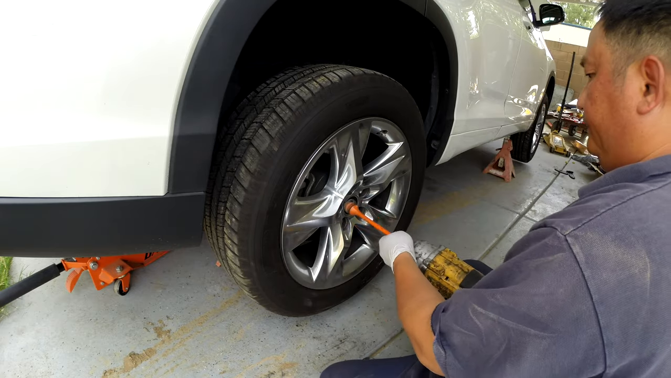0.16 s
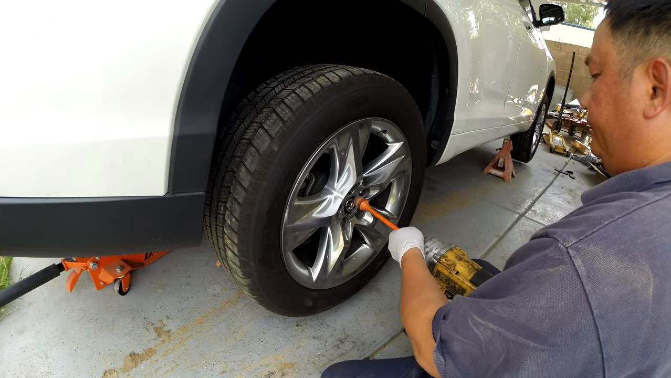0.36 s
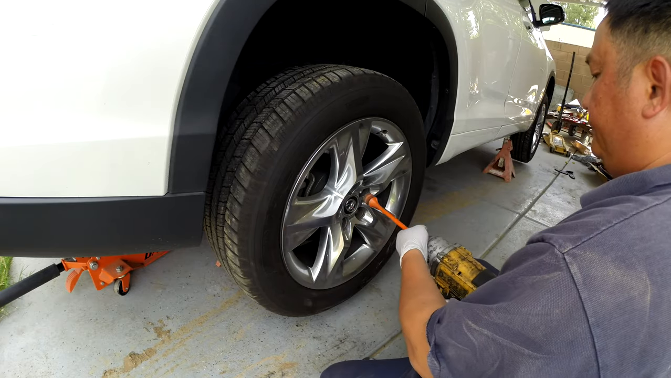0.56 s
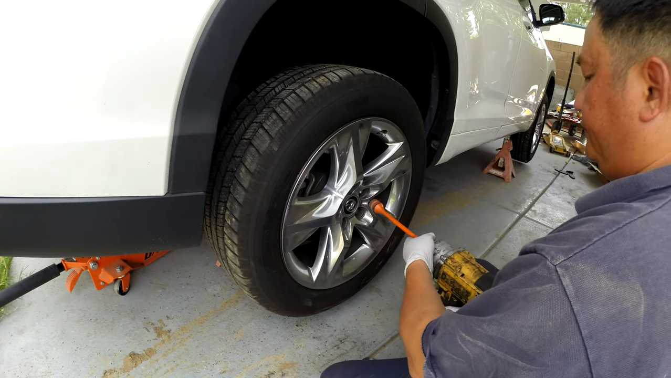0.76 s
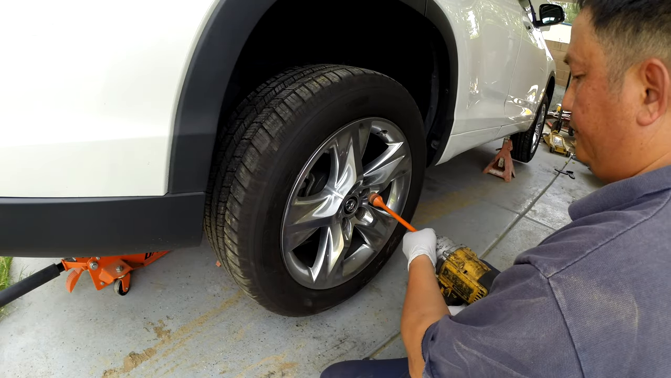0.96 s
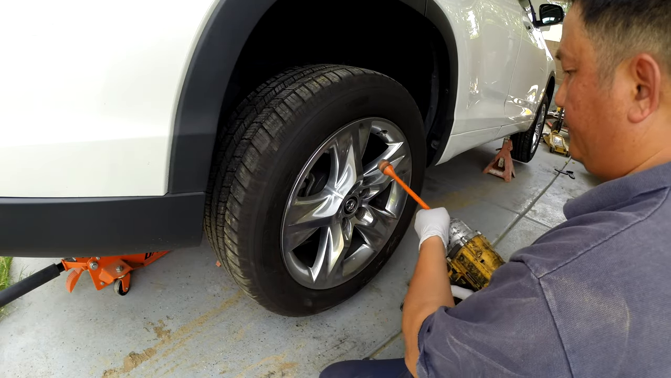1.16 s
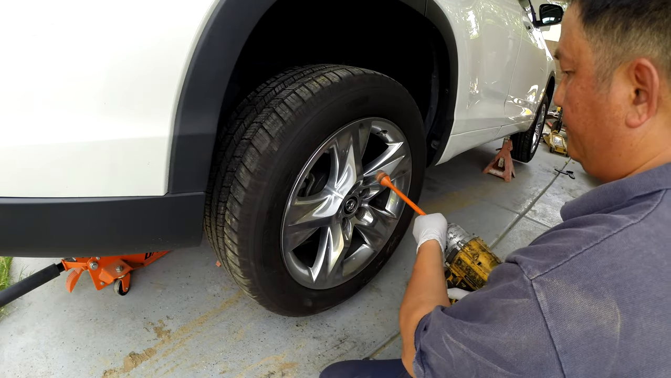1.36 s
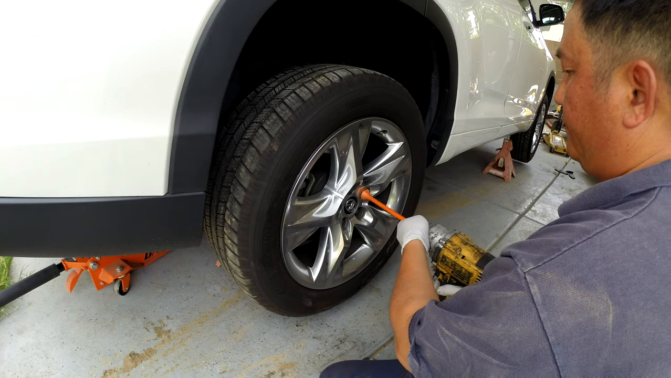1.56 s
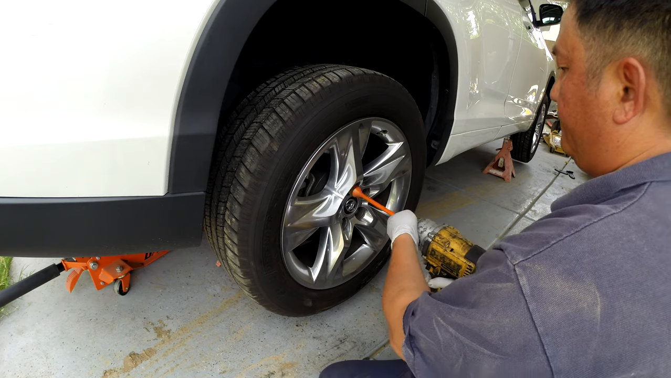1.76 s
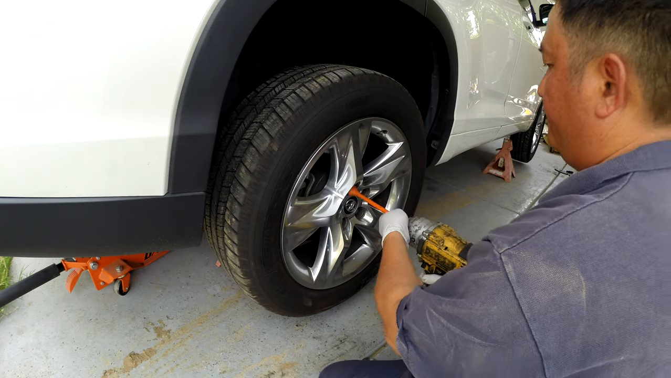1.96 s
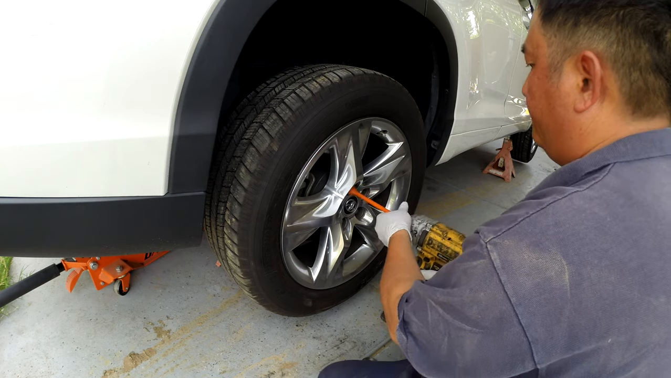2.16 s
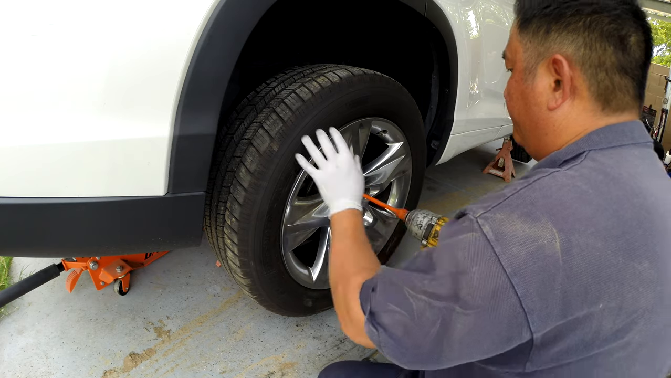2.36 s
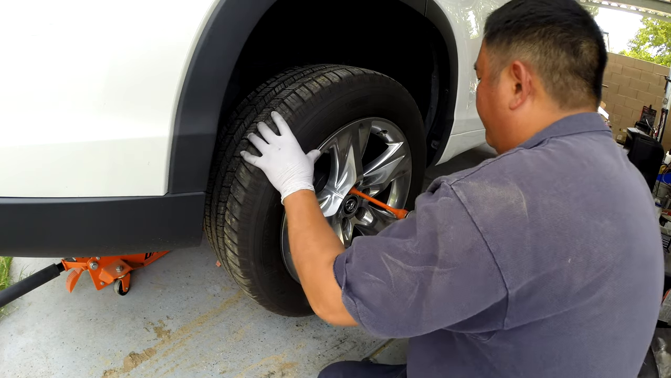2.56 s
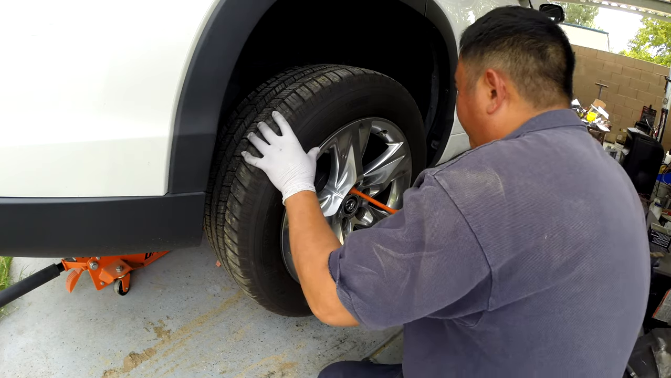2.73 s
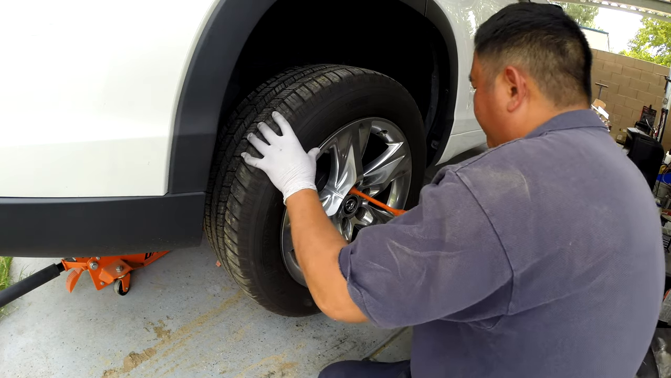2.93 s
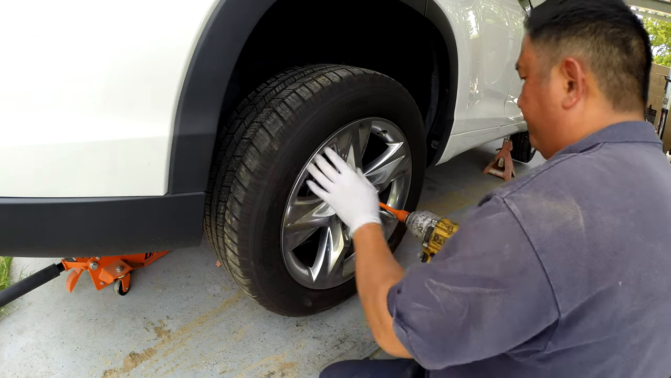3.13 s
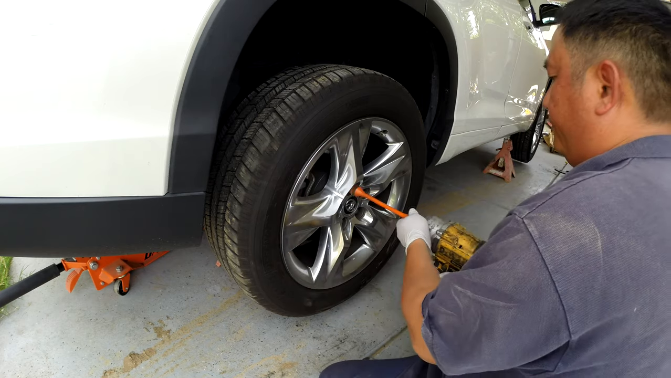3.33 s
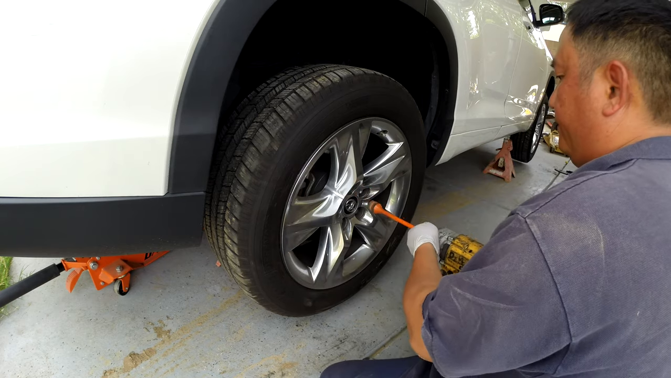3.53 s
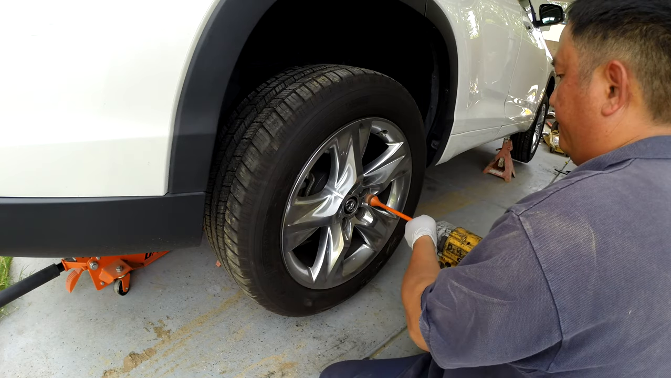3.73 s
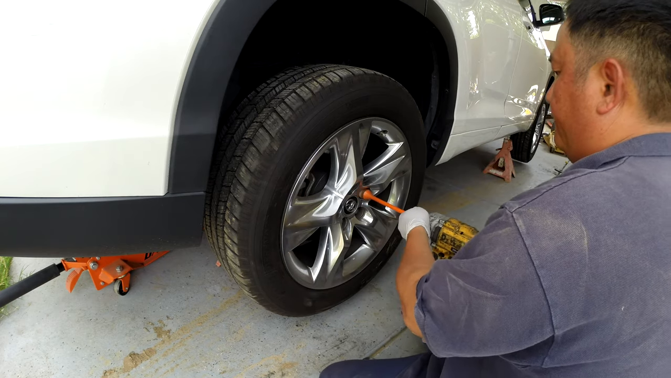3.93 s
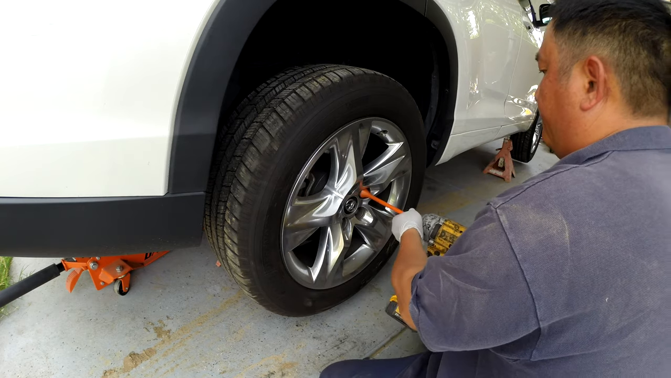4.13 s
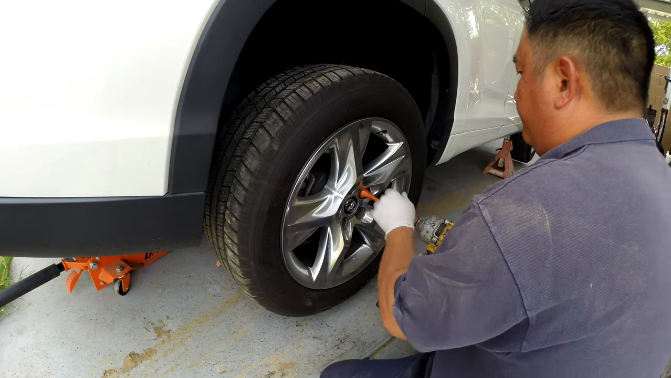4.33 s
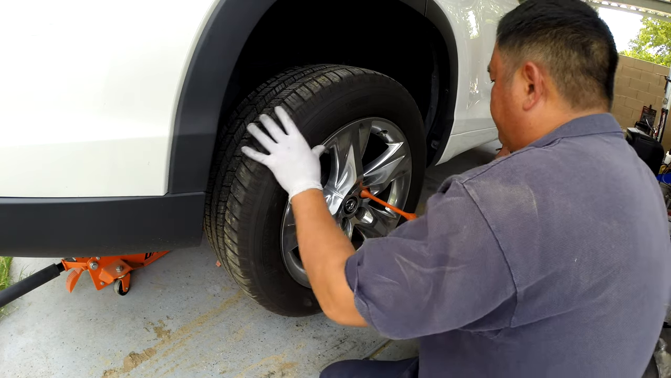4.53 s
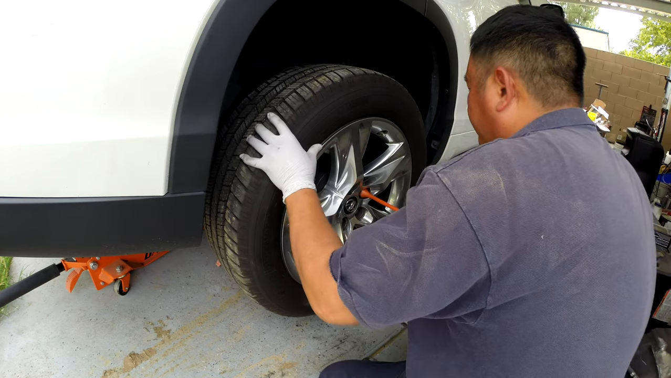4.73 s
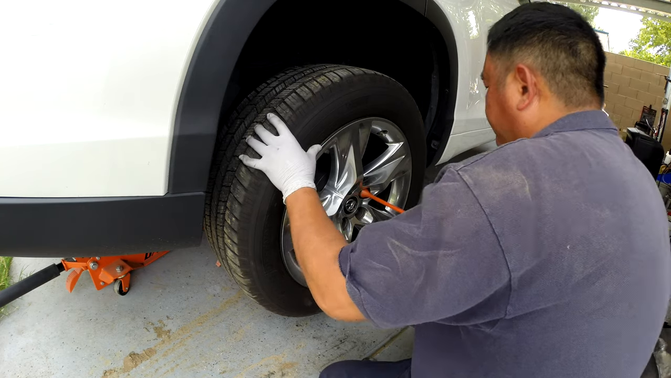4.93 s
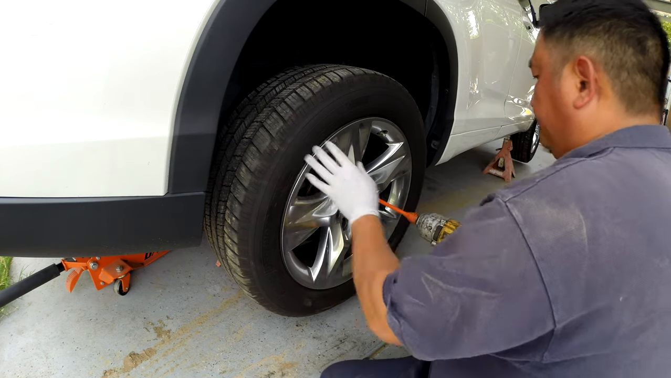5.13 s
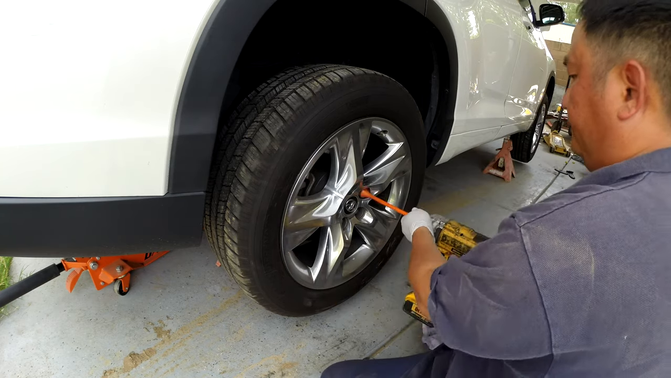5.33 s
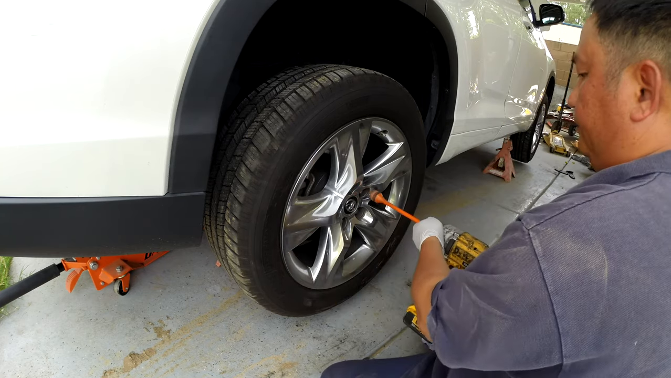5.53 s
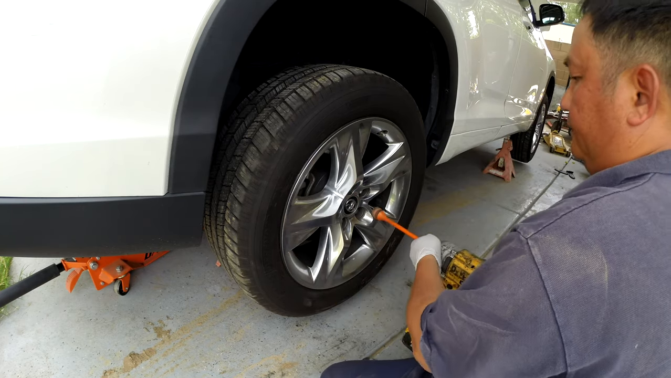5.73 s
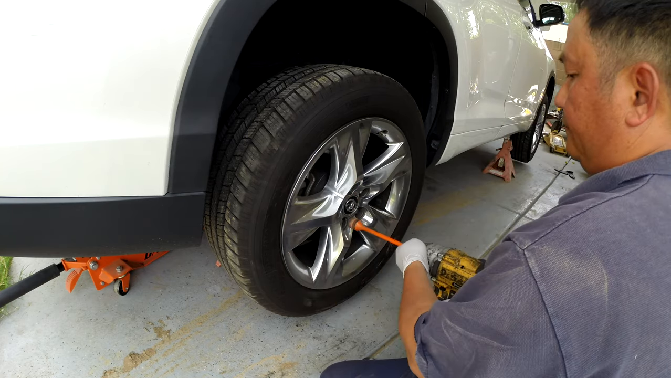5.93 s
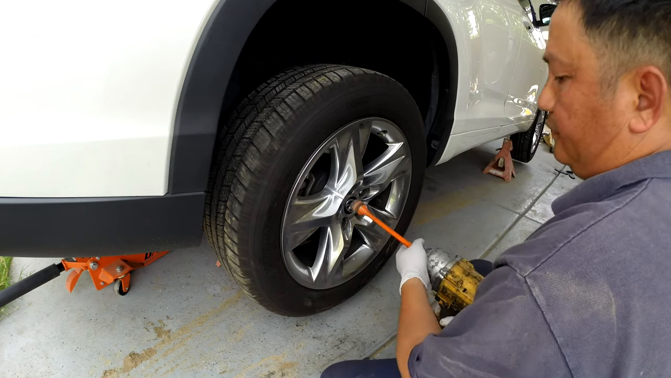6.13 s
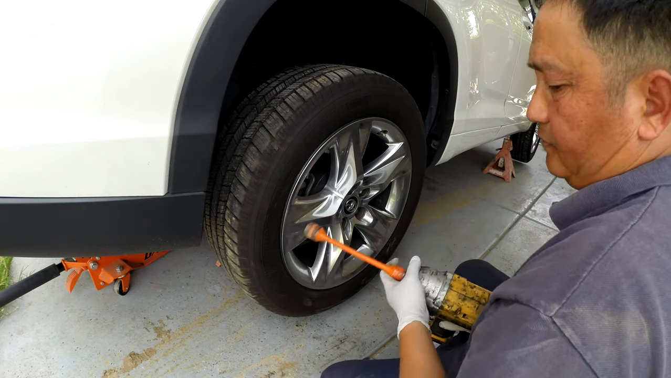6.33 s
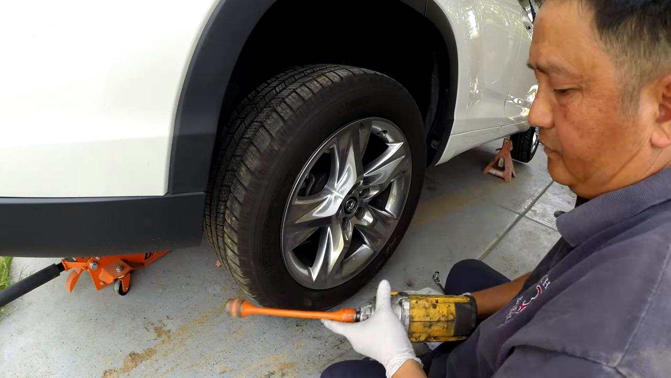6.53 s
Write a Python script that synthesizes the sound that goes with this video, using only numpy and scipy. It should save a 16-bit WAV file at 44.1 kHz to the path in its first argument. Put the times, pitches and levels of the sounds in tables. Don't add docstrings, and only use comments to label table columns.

```python
import sys
import numpy as np
from scipy import signal
from scipy.fft import rfft, irfft
from scipy.io import wavfile

SR = 44100
rng = np.random.default_rng(int(sys.argv[2]) if len(sys.argv) > 2 else 0)


def rack_gain(trim_db):
    fader = np.asarray(trim_db, float)
    return 10 ** (fader / 20)


def transcribe(u):
    v = np.clip(np.atleast_2d(u).T, -1, 1)
    q = np.round(v * 32767).astype(np.int16)
    wavfile.write(sys.argv[1], SR, q)


N = 294572


def rms_one(x):
    return x / np.sqrt(np.mean(x ** 2) + 1e-20)


def filtered(x, order, hz, kind="low"):
    return signal.sosfilt(signal.butter(order, hz, kind, fs=SR, output="sos"), x)


def colour(x, spectrum):
    size = 8192
    hz, db = np.transpose(spectrum)
    grid_hz = np.arange(size // 2 + 1) * SR / size + 1
    gain = rms_one(rack_gain(np.interp(np.log(grid_hz), np.log(hz), db)))
    cepstrum = irfft(np.log(gain))
    cepstrum[1:size // 2] *= 2
    cepstrum[size // 2 + 1:] = 0
    response = irfft(np.exp(rfft(cepstrum)))
    return signal.fftconvolve(x, response)[:N]


def ring(x, hz, t60):
    r = rack_gain(-60 / (t60 * SR))
    w = 2 * np.pi * hz / SR
    return signal.lfilter([0, np.sin(w)], [1, -2 * r * np.cos(w), r * r], x + 1e-18)


def body(x, modes):
    return sum((-1) ** k * rack_gain(db) * ring(x, hz, t60) for k, (hz, db, t60) in enumerate(modes))


def uneven(shape, spread_db):
    size_db = spread_db * np.minimum(rng.exponential(1, shape), 5)
    return rms_one(rng.standard_normal(shape) * rack_gain(size_db))


def chatter(db, rise_ms, decay_ms):
    ms = np.arange(4000) / SR * 1000
    rise, decay = [np.clip(np.reshape(v, (-1, 1)), .1, 30) for v in (rise_ms, decay_ms)]
    shape = (1 - np.exp(-(ms / rise) ** 2)) * np.exp(-ms / decay)
    shape = shape / shape.max(axis=1, keepdims=True)
    return uneven((len(db), len(ms)), spread_db=1.5) * shape * rack_gain(db)[:, None]


def lay(s, rows):
    out = np.zeros(N + rows.shape[1])
    for start, row in zip(np.round(s * SR).astype(int), rows):
        out[start:start + len(row)] += row
    return out[:N]


def low_and_high(x, y):
    return filtered(x, 2, 6000, "low") - filtered(y, 2, 6000, "high")


def contacts(s, rows, bright_db):
    return low_and_high(lay(s, rows), lay(s, rows * rack_gain(bright_db)[:, None]))


# (frequency [Hz], level [dB per Hz])
STREET_SPECTRUM = [(53, -28.5), (90, -3), (130, 0.5), (161, -20), (191, 1.5), (218, -13.5), (357, -17.5),
                   (1190, -24.5), (1920, -29.5), (5060, -36), (13900, -50.5), (15500, -66.5)]


def street(gain_db):
    return rack_gain(gain_db - 51.0) * rms_one(colour(rng.standard_normal(N), STREET_SPECTRUM))


# (frequency [Hz], width [Hz], level [dB])
HUM_TONES = [(190, 12, -57), (118, 10, -63), (1147, 4, -72)]


def compressor(gain_db):
    hum = 0
    for hz, width_hz, db in HUM_TONES:
        t60 = np.log(1000) / np.pi / width_hz
        hum = hum + rack_gain(db) * rms_one(ring(rng.standard_normal(N), hz, t60))
    return rack_gain(gain_db / 2) * hum


# (time [s], top level [dB], half length [s])
WIND_GUSTS = [(0.723, -54, 0.046), (1.024, -51, 0.033), (1.264, -51, 0.076), (1.975, -40, 0.064),
              (2.147, -43, 0.03), (2.282, -41, 0.049), (2.657, -38, 0.017), (4.072, -37, 0.065),
              (4.223, -23.5, 0.028), (4.358, -24.5, 0.044), (4.462, -29, .035), (4.576, -35, 0.088),
              (5.742, -50, .04), (6.062, -50, 0.029), (6.18, -53, .05), (6.565, -52, 0.032)]


def wind(gain_db):
    t = np.arange(N) / SR
    knots = np.arange(100) / 21
    lumps_db = 2.5 * np.interp(t, knots, rng.standard_normal(len(knots)))
    breeze = rack_gain(-52.5 + gain_db + lumps_db)
    gusts = sum(rack_gain(db) * np.exp(-((t - s) / half_s) ** 2) for s, db, half_s in WIND_GUSTS)
    rumble = filtered(rng.standard_normal(N), 2, [28, 85], "band")
    return (breeze + gusts) * rms_one(rumble)


# (time [s], level [dB])
GAIN_CONTROL = [(0, 0.5), (.35, -3.5), (.8, 2.5), (1.7, 1), (2.5, 2.5), (2.7, 6), (3.2, -5.5), (3.6, -5.5),
                (3.9, -1), (4.5, 3), (4.8, 4), (5.3, -1), (5.7, -1.5), (6.0, 1.5), (6.68, 1)]


def surroundings():
    s, db = np.transpose(GAIN_CONTROL)
    gain_db = np.interp(np.arange(N) / SR, s, db)
    return street(gain_db) + compressor(gain_db) + wind(gain_db)


def carport(x):
    t60_s, top_t60_s = 0.35, .24
    t = np.arange(SR // 2) / SR
    noise = signal.lfilter([1, -.97], [1, -.86], rng.standard_normal(len(t)))
    low = filtered(noise, 2, 5000)
    tail = low * rack_gain(-60 * t / t60_s) + (noise - low) * rack_gain(-60 * t / top_t60_s)
    tail *= 1 - np.exp(-(t / .007) ** 2)
    return signal.fftconvolve(x, tail / np.sqrt(np.sum(tail ** 2)))[:N]


# (frequency [Hz], level [dB], ring time t60 [s])
BOWL_TAIL = (676, -33, .15)


def strike(s, db):
    push = lay(s, rack_gain(db)[:, None])
    bowl_hz = 673
    bowl = ring(ring(push, bowl_hz, t60=0.016), bowl_hz, t60=.028) / 25
    return bowl + body(push, [BOWL_TAIL])


# (time [s], level [dB])
TYRE_THUDS = [(1.934, -27.5), (2.125, -43), (2.253, -33), (2.31, -34.5), (2.613, -39.5), (2.646, -22),
              (5.097, -34), (4.2, -34), (4.36, -52.5)]
# (frequency [Hz], level [dB], ring time t60 [s])
TYRE_MODES = [(167, -7.5, 0.056), (240, -5, 0.044), (390, 0, 0.01)]


def thuds():
    s, db = np.transpose(TYRE_THUDS)
    return body(lay(s, chatter(db - 16, rise_ms=1.2, decay_ms=3.4)), TYRE_MODES)


# (time [s], level [dB], decay [ms])
SOCKET_DRAGS = [(1.936, -24, 10), (2.254, -32.5, 14), (2.31, -38.5, 16), (2.62, -24, 34), (4.59, -21.5, 34),
                (.197, -40.5, 12), (4.02, -27, 20), (4.202, -31, 12), (4.356, -38, 22), (5.172, -30.5, 15),
                (2.68, -18.5, 23), (4.679, -24, 25), (5.535, -41, 10), (5.785, -53, 12)]


def drags():
    s, db, decay_ms = np.transpose(SOCKET_DRAGS)
    return ring(lay(s, chatter(db - 22.5, 5.0, decay_ms)), BOWL_TAIL[0], t60=.07)


TUBE_LOW_HZ, TUBE_LOW_T60_S = 8780, .035
TUBE_HIGH_HZ, TUBE_HIGH_T60_S = 14050, .07
# (time [s], lower mode level [dB], upper mode level [dB])
TUBE_RINGS = [(1.877, -41, -72), (1.9071, -52, -58), (2.3112, -71, -75), (3.3782, -64, -82),
              (3.5683, -76, -112), (4.0184, -45, -59), (4.042, -46, -68), (4.0553, -44, -72),
              (4.1814, -57.5, -76), (5.506, -47.5, -76), (5.53, -56, -78), (5.5732, -75, -81)]


def socket():
    s, low_db, high_db = np.transpose(TUBE_RINGS)
    low = lay(s, chatter(low_db - 8.5, rise_ms=0.35, decay_ms=3.1))
    high = lay(s, chatter(high_db - 8.5, rise_ms=0.35, decay_ms=3.1))
    return ring(low, TUBE_LOW_HZ, TUBE_LOW_T60_S) + ring(high, TUBE_HIGH_HZ, TUBE_HIGH_T60_S)


# (frequency [Hz], level [dB per Hz])
TOUCH_SPECTRUM = [(200, -24), (500, 6.5), (1500, 4), (2500, 2), (4000, -2.5), (7000, -12), (15000, -28.5)]
# (frequency [Hz], level [dB], ring time t60 [s])
SPOKE_MODES = [(290, -12, .025), (480, -8, .025), (930, -4, .025), (1190, -1.5, .03), (1505, -2, .022),
               (1900, -5, .018)]


def touches(table, rise_ms, level_db):
    s, clatter_db, wheel_db, bright_db, spokes_db, decay_ms = np.transpose(table)
    steel = contacts(s, chatter(clatter_db + level_db, rise_ms, decay_ms), bright_db + 13.5)
    spokes = body(lay(s, chatter(spokes_db - 24.0, rise_ms, decay_ms)), SPOKE_MODES)
    return colour(steel, TOUCH_SPECTRUM) + spokes + strike(s, wheel_db - 0.5)


def light(table, decay_ms):
    return [(s, db, db - 27, -12.5, db - 12.5, decay_ms) for s, db in table]


# (time [s], clatter level [dB], wheel level [dB], decay [ms])
NUT_SLIDES = [(.1942, -34.5, -61, 4.2), (2.0717, -39.5, -42, 38), (2.1101, -29.5, -59, 12),
              (2.1234, -24.5, -33.5, 5.7), (2.251, -30, -28.5, 7.3), (2.2954, -43.5, -37, 9.5),
              (2.3117, -34, -44, 5.2), (3.4074, -32, -53, 8.6), (3.4444, -39.5, -30, 9.6),
              (4.0178, -23, -22, 6.5), (4.0589, -19.5, -29, 5.2), (4.1564, -36.5, -49, 13),
              (4.1819, -28, -36, 16), (4.2004, -23.5, -20.5, 6.9), (4.3564, -33.5, -42, 13),
              (5.5414, -30.5, -22.5, 4.2), (5.5932, -33, -36, 3), (5.7609, -50.5, -58, 8.6),
              (5.785, -48, -55, 22), (5.8548, -49, -66, 7.2), (6.4677, -45.5, -51, 10)]
# (time [s], level [dB], decay [ms])
GLOVE_SCUFFS = [(2.074, -38, 25), (2.119, -31, 10), (2.3, -43, 9.4), (5.77, -48, 20), (5.799, -51, 12.5),
                (5.853, -47, 13), (6.455, -46, 12.5)]
# (time [s], clatter level [dB])
STEEL_RUBS = [(.0114, -50), (.0508, -48.5), (.0674, -52), (2.5384, -45), (4.5047, -47.5), (5.4729, -52),
              (5.9304, -50.5), (6.4148, -49.5)]


def slides_and_rubs():
    bright_db = -31
    soft = [(s, db, wheel_db, bright_db, db - 12.5, ms) for s, db, wheel_db, ms in NUT_SLIDES]
    soft += [(s, db - 10, -80, bright_db, db, ms) for s, db, ms in GLOVE_SCUFFS]
    return touches(soft + light(STEEL_RUBS, decay_ms=10), rise_ms=2.4, level_db=-6.5)


# (time [s], clatter level [dB], wheel level [dB], brightness [dB], spokes level [dB])
SOCKET_KNOCKS = [(.1436, -39, -64, -23, -38), (.171, -27.5, -26.5, -22, -26.5),
                 (1.733, -21.5, -13.5, -20, -14.5), (1.8771, -25, -48, -12, -54),
                 (1.9061, -23.5, -52, -17, -41), (1.933, -19, -21, -29, -17.5),
                 (3.3762, -36.5, -44, -22, -44), (3.3922, -29.5, -22.5, -26, -26.5),
                 (3.8891, -24.5, -19, -35, -25), (3.919, -39, -28.5, -25, -38),
                 (3.9948, -18.5, -6.5, -31, -18.5), (4.0452, -24.5, -38, -14, -44),
                 (4.3819, -38.5, -39, -30, -56), (5.5054, -32.5, -64, -19, -44),
                 (5.5303, -28, -28.5, -34, -30.5), (5.5737, -28, -26.5, -48, -36)]
# (time [s], clatter level [dB])
STEEL_TICKS = [(.6903, -42), (2.1854, -35.5), (2.372, -44.5), (3.5603, -46.5), (3.5894, -64.5),
               (3.9828, -39), (4.5321, -43), (5.4929, -43), (5.9444, -57), (6.2457, -45), (6.2846, -40.5),
               (6.3814, -44)]


def knocks_and_ticks():
    sharp = [tuple(row) + (5.93,) for row in SOCKET_KNOCKS]
    return touches(sharp + light(STEEL_TICKS, decay_ms=1.1), rise_ms=.3, level_db=-3.0)


def by_hand():
    return knocks_and_ticks() + slides_and_rubs() + socket() + thuds() + drags()


# (pulled [s], motor at speed [s], released [s])
TRIGGER_PULLS = [
    (2.591, 2.693, 3.098),
    (4.551, 4.67, 5.123),
]
# (time after release [s], level against full speed [dB])
RUN_DOWN = [
    (.05, -12.5),
    (.12, -15),
    (.34, -45.5),
]


def gears():
    start_db, full_db, silent_db = -51, -24, -90
    curve = []
    for pulled, at_speed, released in TRIGGER_PULLS:
        curve += [(pulled - .005, silent_db), (pulled, start_db), (at_speed, full_db), (released, full_db)]
        curve += [(released + s, full_db + db) for s, db in RUN_DOWN]
        curve += [(released + .4, silent_db)]
    s, db = np.transpose(curve)
    rattle_db = np.interp(np.arange(N) / SR, s, db)
    rattle = rack_gain(rattle_db) * uneven(N, spread_db=2.5)
    rattle = rack_gain(2.0) * filtered(rattle, 1, 2600)
    bright_db = 10.5 + 0.26 * (rattle_db + 20.5)
    return low_and_high(rattle, rattle * rack_gain(bright_db))


# (top of first blow [s], time a blow [s], blows [count], clatter level [dB], wheel level [dB])
HAMMER_BURSTS = [
    (2.7367, .0266, 14, -13, -25),
    (4.704, .0261, 16, -13.5, -23.5),
]


def steady_blows():
    rows = []
    for first_s, period_s, count, clatter_db, wheel_db in HAMMER_BURSTS:
        t = period_s * np.arange(count)
        chance = rng.standard_normal((count, 4))
        rise_ms = rng.uniform(5.5, 8, count)
        start_s = first_s + t + .0008 * chance[:, 0] - rise_ms / 1000
        blow_db = clatter_db - 7 * t + .7 * chance[:, 1]
        bowl_db = wheel_db - 12.5 * t + chance[:, 2]
        bright_db = -9.7 + chance[:, 3]
        decay_ms = np.full(count, 4.0)
        rows += zip(start_s, blow_db, bowl_db, bright_db, rise_ms, decay_ms)
    return rows


# (time [s], clatter level [dB], wheel level [dB], rise [ms], decay [ms])
RUN_UP_BLOWS = [(2.6148, -23, -28, 0.48, 9.9), (2.648, -13, -23.5, 6, 1.44), (2.6739, -8, -7.5, 3.2, 7),
                (2.698, -20.5, -21, 7, 6), (2.7062, -9.5, -10.5, 3, 2.5), (4.558, -33, -47, 2.5, 2.7),
                (4.582, -18, -13, 0.98, 6.1), (4.6119, -14, -20.5, 3.2, 6.3), (4.641, -6.5, -20, 4.5, 3.8),
                (4.6714, -8, -8, 6.4, 4.7)]
# (time [s], clatter level [dB], wheel level [dB], brightness [dB])
COAST_CLICKS = [(3.099, -28, -28.5, -4.5), (3.107, -16.5, -44, -3.5), (3.1343, -16.5, -37.3, -4.5),
                (5.1334, -25, -42, -4.5), (5.145, -21, -52, -2), (5.1702, -23, -20, 4.5),
                (5.1886, -20, -38.5, -3)]


def blows():
    run_up = [(s, db, wheel_db, -15.5, rise, decay) for s, db, wheel_db, rise, decay in RUN_UP_BLOWS]
    coast = [tuple(row) + (0.77, 3.65) for row in COAST_CLICKS]
    return run_up + steady_blows() + coast


# (frequency [Hz], level [dB], ring time t60 [s])
HUB_MODES = [(112, -24, .1), (150, -23, .1), (262, -25, .06), (345, -24, .1)]
# (frequency [Hz], level [dB], ring time t60 [s])
DRIVEN_BOWL = [(670, -39, 0.13)]


def hub(s, db, steel):
    return body(lay(s, rack_gain(db)[:, None]), HUB_MODES) + body(steel, DRIVEN_BOWL)


# (frequency [Hz], level [dB per Hz])
HAMMER_SPECTRUM = [(59, -41), (100, -6), (347, -11.5), (394, -9), (668, 3), (1040, -2.5), (1490, 2.5),
                   (3250, 3), (5100, -2), (6300, -7.5), (8580, -9), (15500, -19.5)]
# (frequency [Hz], level [dB], ring time t60 [s])
ANVIL_MODES = [(149, -44.5, 0.13), (338, -37, 0.021), (1557, -42, 0.084), (2100, -45, 0.014),
               (3130, -36.5, 0.0091), (3770, -35, 0.0078), (4220, -35.5, 0.005), (6100, -39, 0.011)]


def hammer():
    s, clatter_db, wheel_db, bright_db, rise_ms, decay_ms = np.transpose(blows())
    steel = contacts(s, chatter(clatter_db, rise_ms, decay_ms), bright_db + 10) + gears()
    housing = colour(steel, HAMMER_SPECTRUM)
    anvil = body(steel, ANVIL_MODES)
    tube = body(steel, [(TUBE_LOW_HZ, -41, TUBE_LOW_T60_S), (TUBE_HIGH_HZ, -47, TUBE_HIGH_T60_S)])
    wheel = strike(s + rise_ms / 2000, wheel_db - 5.5) + hub(s + rise_ms / 1000, clatter_db, steel)
    return housing + anvil + tube + wheel


def scene():
    near = by_hand() + hammer()
    thin = filtered(near, 1, 1000, "high")
    echoes = rack_gain(-9) * carport(thin)
    return (surroundings() + near + echoes)[None, :]


def roll_off(x):
    return signal.sosfilt(signal.butter(12, 16300, fs=SR, output="sos"), x)


def record(dry):
    rounded = 1.05 * np.tanh(dry / 1.05)
    mix = signal.sosfilt(signal.cheby2(10, 45, 15800, fs=SR, output="sos"), rounded)
    return roll_off(mix)


dry = scene()
out = record(dry)
transcribe(out)
```